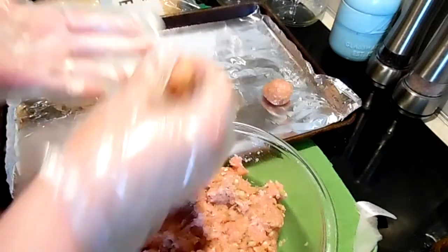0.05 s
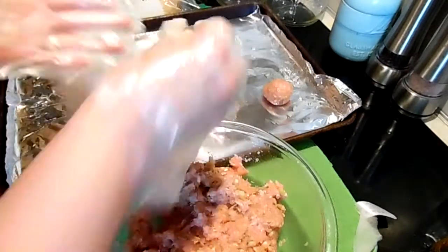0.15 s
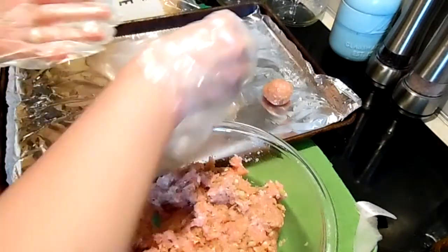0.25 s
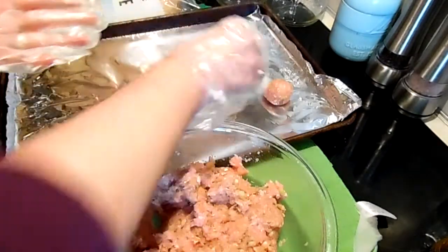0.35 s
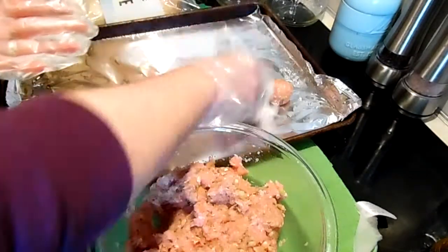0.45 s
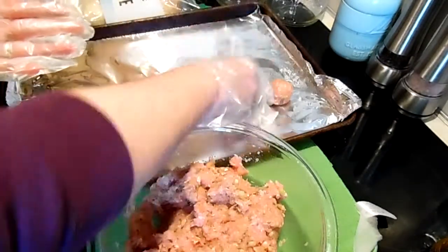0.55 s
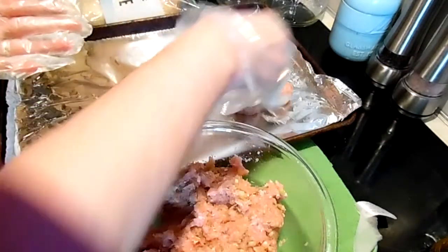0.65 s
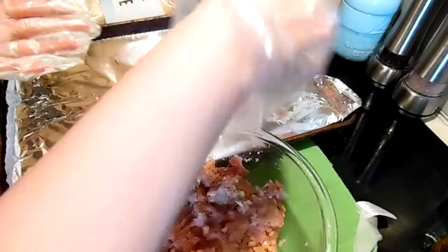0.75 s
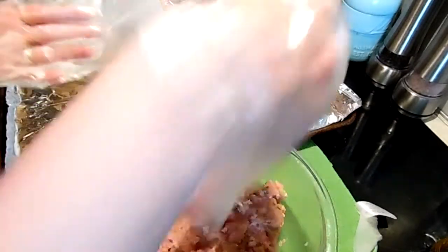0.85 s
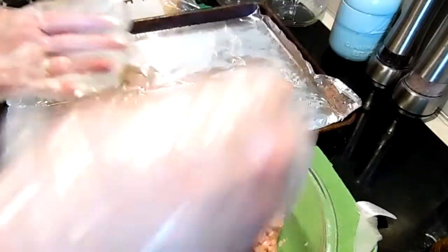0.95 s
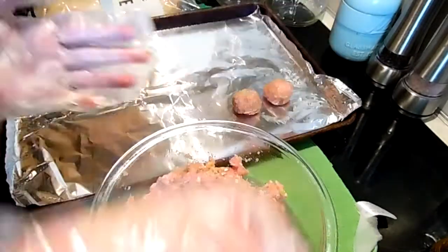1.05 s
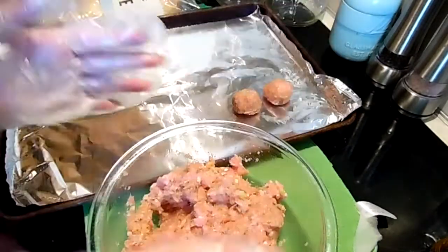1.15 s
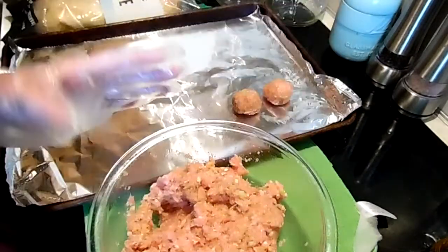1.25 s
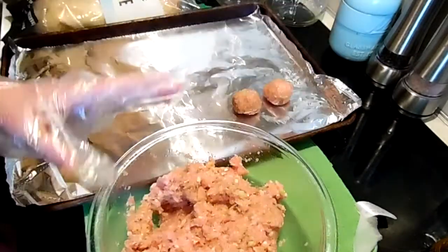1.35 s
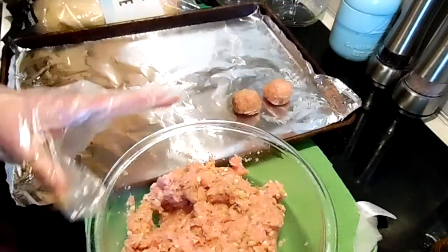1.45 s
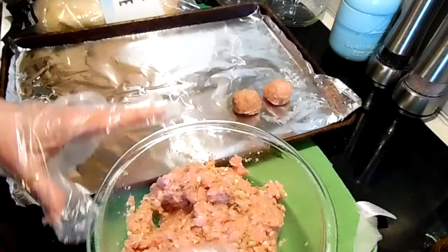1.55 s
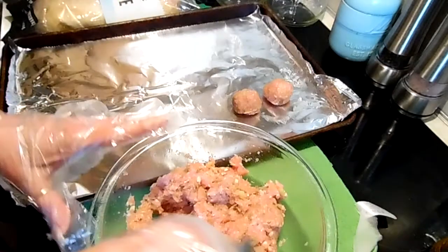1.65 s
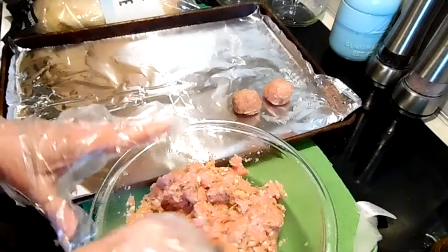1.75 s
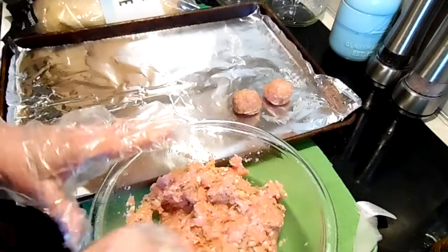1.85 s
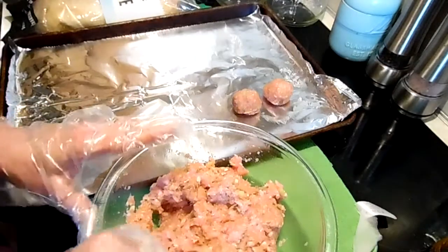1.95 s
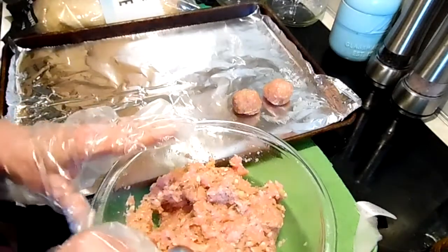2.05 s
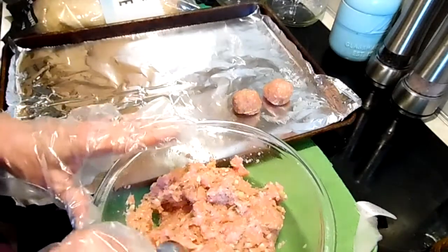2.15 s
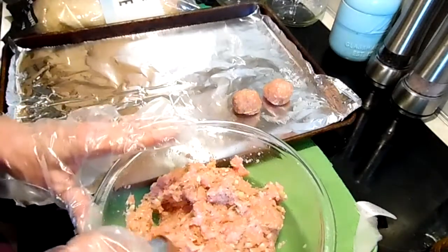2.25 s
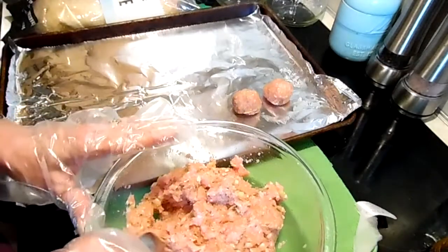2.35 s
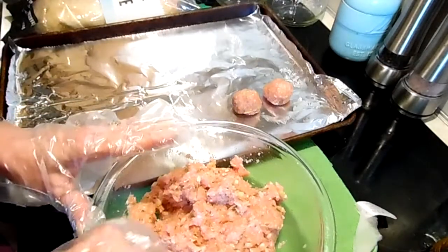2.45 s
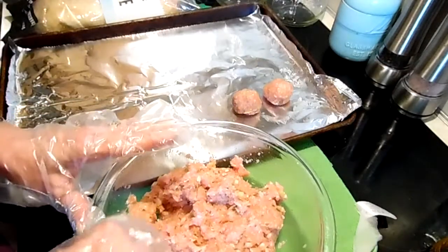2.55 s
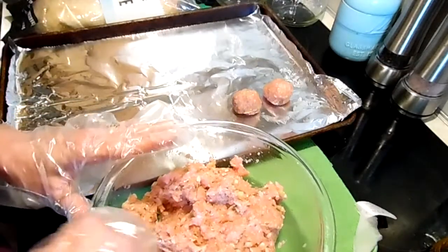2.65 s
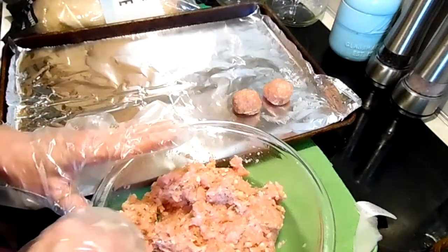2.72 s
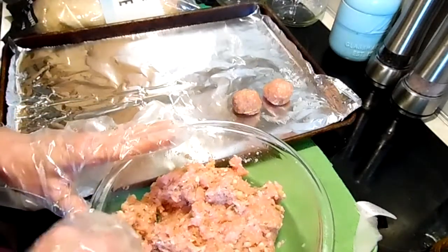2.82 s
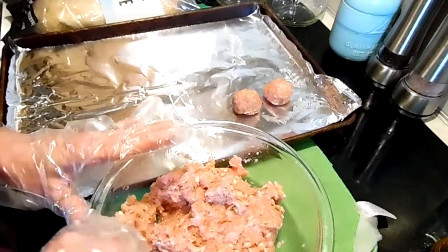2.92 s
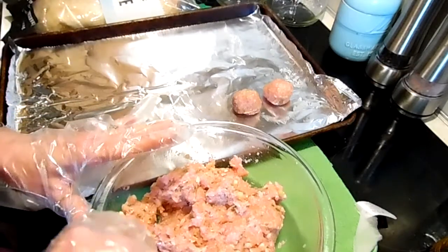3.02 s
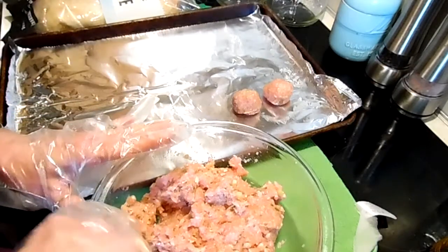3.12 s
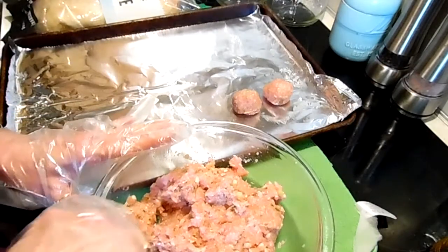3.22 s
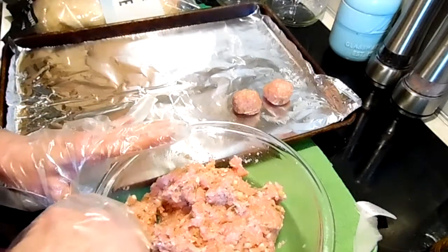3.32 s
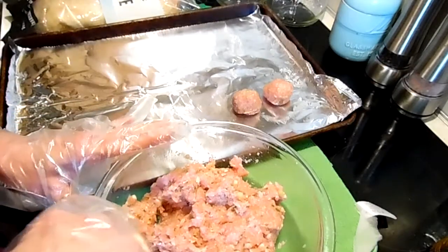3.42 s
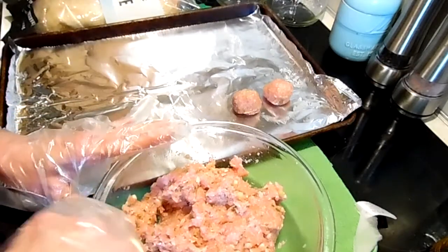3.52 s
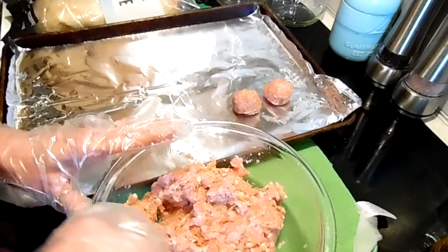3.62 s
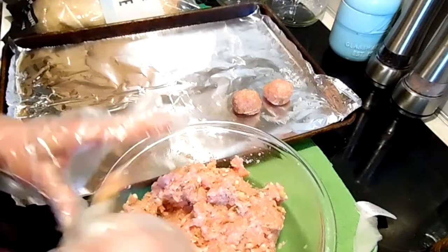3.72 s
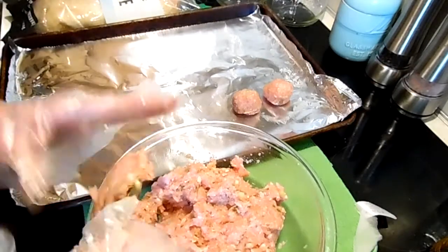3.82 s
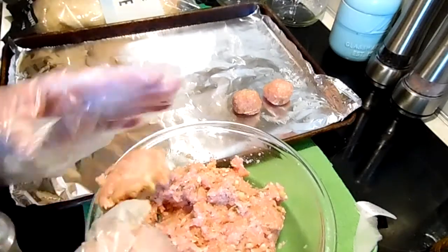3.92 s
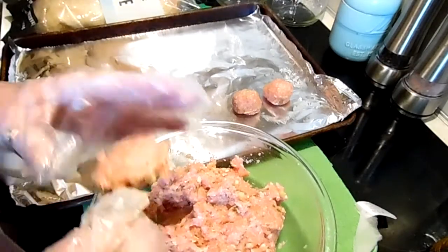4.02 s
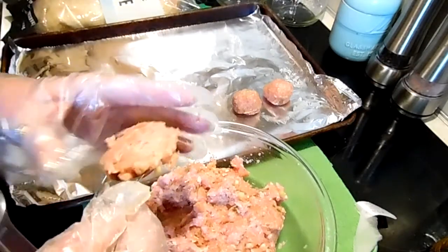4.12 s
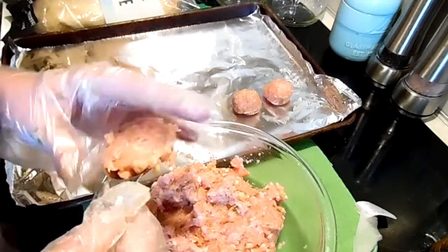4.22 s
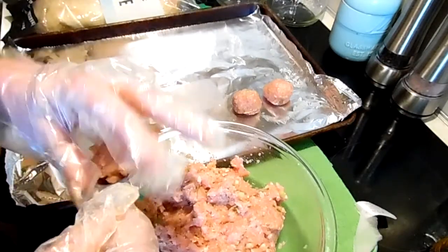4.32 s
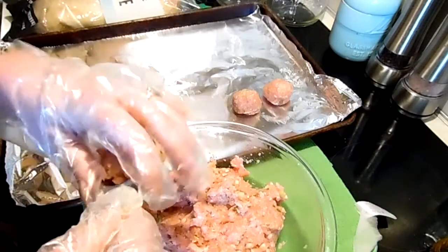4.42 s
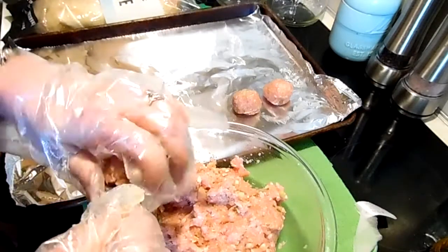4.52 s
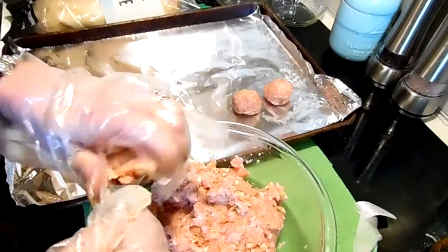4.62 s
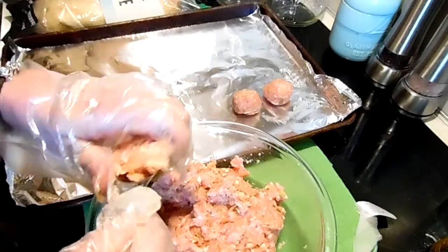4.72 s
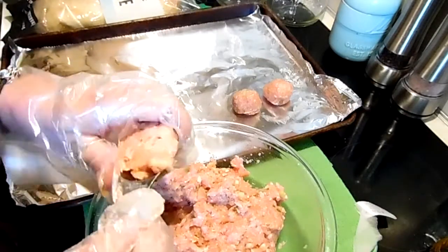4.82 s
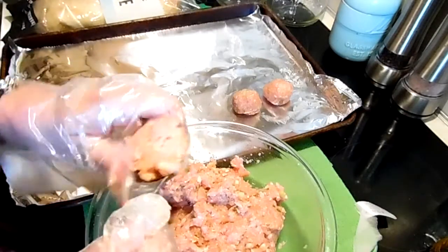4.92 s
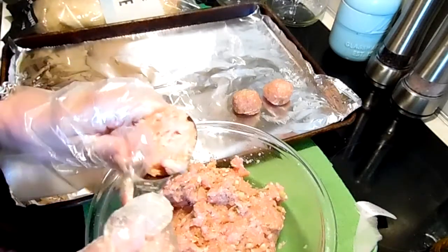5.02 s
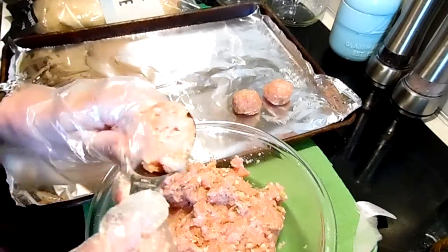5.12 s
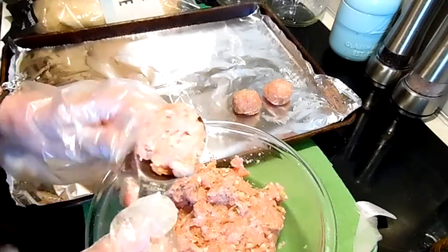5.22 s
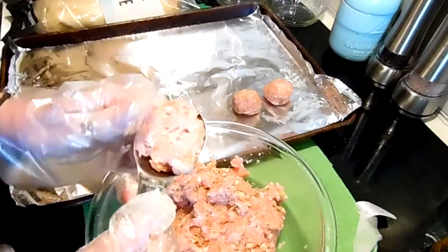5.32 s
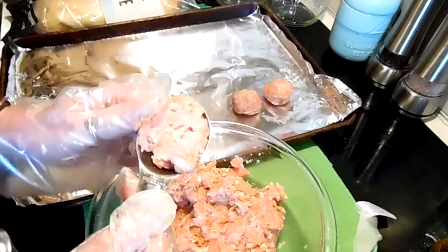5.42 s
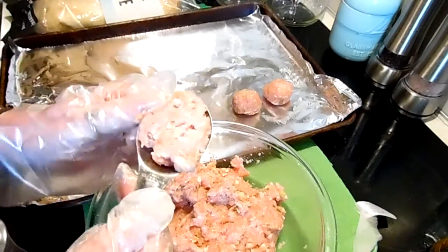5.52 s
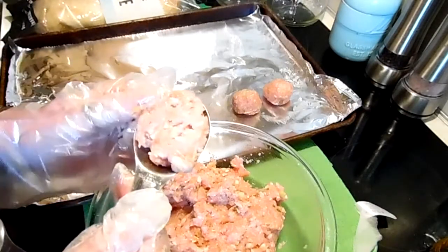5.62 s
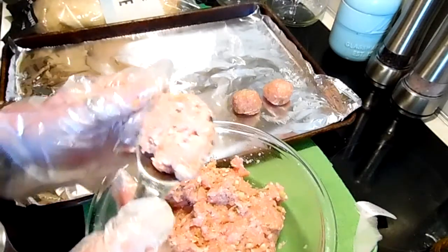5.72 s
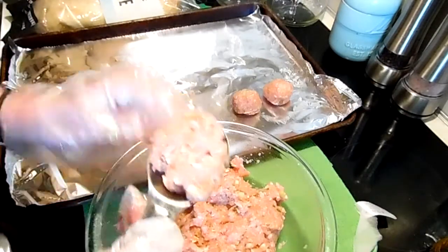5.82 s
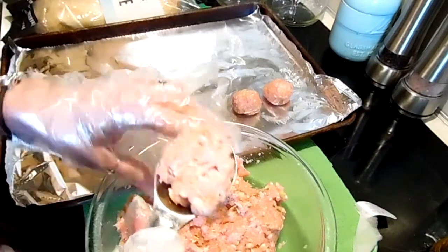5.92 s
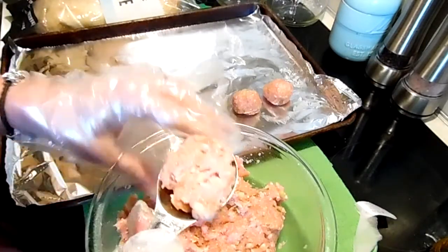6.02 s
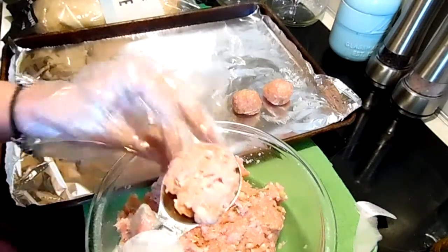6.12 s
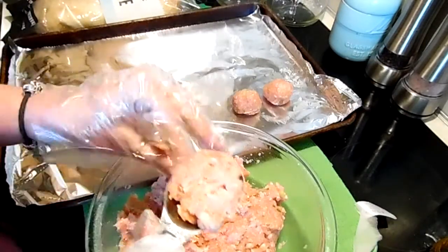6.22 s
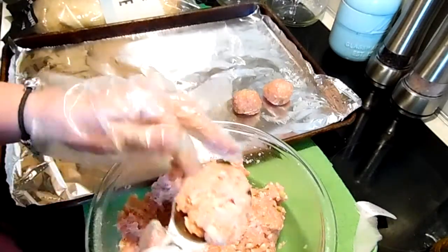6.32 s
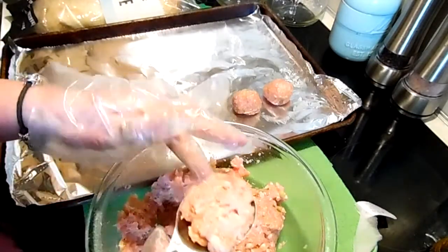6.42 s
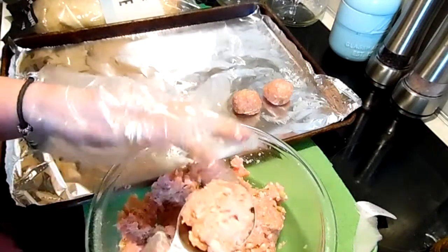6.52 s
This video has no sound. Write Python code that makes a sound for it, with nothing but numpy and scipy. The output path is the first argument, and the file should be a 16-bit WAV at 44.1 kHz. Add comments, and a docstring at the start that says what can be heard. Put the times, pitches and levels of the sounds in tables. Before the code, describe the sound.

Thin plastic gloves crinkle close by in uneven bursts, and a metal spoon briefly clinks on a glass bowl over a low appliance hum.

```python
"""In a kitchen, thin plastic gloves crinkle close to one microphone as minced food is scooped and rolled.
The film buckles facet by facet, each facet radiating a click; a sudden pull, or a ball of food landing
on a foil tray, releases a burst of them. A metal spoon clinks and chatters on a glass bowl, exciting
its normal modes, and hands, food and utensils knock dully. Appliances hum over the air of the room."""
import sys
import numpy as np
from scipy import signal
from scipy.fft import rfft, irfft
from scipy.io import wavfile
from scipy.ndimage import uniform_filter1d

SR = 44100
rng = np.random.default_rng(int(sys.argv[2]) if len(sys.argv) > 2 else 0)


def to_wav(s):
    """Save 16-bit WAV."""
    ch = np.atleast_2d(s).T  # columns
    pcm = np.round(np.clip(ch, -1, 1) * 32767)  # PCM
    wavfile.write(sys.argv[1], SR, pcm.astype(np.int16))


N = 289104

# The swell of the whole background. Each row: time in seconds, level of the room air in dB.
BACKGROUND = [(0, -44), (.2, -41.5), (.56, -44.5), (.71, -50.5), (.82, -48.5), (1.31, -51), (1.92, -54.5),
              (2.55, -54.5), (2.94, -52.5), (3.45, -51.5), (4.38, -49), (5.11, -49), (5.82, -47.5),
              (5.97, -46), (6.56, -48)]


def gloves():
    """Incoherent sources add in power: fidgeting and squeezes sum to set the level of the crackle."""
    # Steady fidgeting. Each row: time in seconds, level in dB.
    fidgeting = [(0.0, -40), (0.05, -44.5), (0.45, -47.5), (0.6, -43), (0.705, -37.5), (0.727, -45.5),
                 (1.0, -50), (1.055, -45), (1.18, -43), (1.385, -31.5), (1.5, -41), (1.75, -42),
                 (2.08, -47), (2.19, -53), (2.7, -52.5), (3.0, -51.5), (3.54, -57.5), (3.58, -48),
                 (3.63, -54), (3.68, -40), (3.85, -39.5), (4.24, -40.5), (4.4, -37), (4.8, -39),
                 (4.86, -43.5), (5.22, -40), (5.5, -39), (5.66, -46), (5.77, -48), (5.83, -37),
                 (6.23, -37.5), (6.37, -42.5), (6.56, -32.5)]
    # Squeezes and rubs. Each row: time of the top in seconds, level in dB, rise and fall in seconds.
    squeezes = [(0.014, -28.5, 0.07, 0.017), (.11, -42.5, 0.071, 0.038), (.27, -41, 0.054, 0.12),
                (.39, -37.5, 0.067, 0.023), (.53, -26, 0.07, 0.064), (0.641, -25, 0.03, 0.028),
                (.86, -50, .1, .04), (.94, -48, .02, .05), (1.025, -36, 0.028, 0.027),
                (1.09, -41, .03, 0.07), (1.334, -30, 0.053, 0.081), (1.47, -35, 0.075, 0.032),
                (1.54, -36, 0.024, 0.021), (1.575, -32.5, 0.027, 0.051), (1.92, -45, 0.11, 0.043),
                (2.08, -45, .07, 0.091), (2.32, -58, .08, .03), (2.4, -48.5, 0.055, 0.2),
                (2.712, -49.5, 0.0072, 0.2), (2.9, -48.5, 0.012, .12), (3.12, -50, 0.095, 0.026),
                (3.24, -50.5, .03, .05), (3.59, -43, 0.028, 0.036), (3.74, -33.5, 0.1, 0.012),
                (3.79, -35.5, .03, 0.044), (4.03, -39.5, 0.24, 0.091), (4.35, -34, 0.06, .05),
                (4.46, -37, .06, 0.36), (4.79, -36.5, 0.14, 0.025), (4.99, -33, 0.24, 0.091),
                (5.14, -39.5, 0.072, 0.13), (5.28, -38.5, 0.052, 0.088), (5.375, -38, .03, 0.038),
                (5.93, -26.5, 0.097, 0.054), (6.14, -31, 0.19, 0.13), (6.33, -26, 0.097, 0.037),
                (6.44, -31, 0.1, 0.055)]
    # Duller creases under a crinkle of -40 dB. Each row: time in seconds, relative level in dB.
    crease_levels = [(0, -11.5), (.3, -15), (.48, -8.5), (.59, -9.5), (.65, -21), (.9, -15), (1.2, -16.5),
                     (1.38, -9), (1.5, -15.5), (2.2, -15), (3.5, -12.5), (3.85, -16.5), (4.4, -12),
                     (5.3, -15.5), (5.9, -12.5), (6.56, -14)]
    # Their spectrum. Each row: frequency in Hz, relative spectral density in dB.
    crease_spectrum = [(350, -40), (600, -3), (1000, -4), (2000, -1), (3500, -0.5), (5000, -2.5),
                       (8000, -26.5)]
    t = np.arange(N) / SR
    power = amp(curve(fidgeting, t)) ** 2
    for top, db, rise, fall in squeezes:
        power += amp(db - 15 * np.maximum((top - t) / rise, (t - top) / fall)) ** 2  # ends 15 dB down
    level_db = 10 * np.log10(power)
    lively_db = level_db + 40
    centre_hz = 8600 * (1 + 0.002 * lively_db + 0.015 * wander(12))  # lively hands pull the film tighter
    crease_db = curve(crease_levels, t) - 0.24 * lively_db + 2.1 * wander(8)  # creases grow more slowly
    clumps_db = 0.54 * wander(60) + 1.03 * wander(200)
    clicks = crackle(N, per_s=4000, spread_db=2, tail_db=4, tail_t60=0.075)
    film = film_colour(clicks, lambda s: np.interp(s, t, centre_hz), patchy_db=1.5)
    creases = unit_rms(shaped(clicks, lambda hz, s: spectrum_db(crease_spectrum, hz)))
    return amp(level_db + clumps_db) * (film + amp(crease_db) * creases)


def snaps():
    """A sudden load on film or foil sets off an avalanche of buckling that decays exponentially."""
    # Pulls of the film and touches on the tray. Each row: start in seconds, level in dB, centre in Hz.
    pulls = [(.0877, -42, 9170), (.2097, -34, 9420), (.473, -40, 7620), (.5373, -5.5, 9700),
             (.5474, -29, 11000), (.5594, -26, 6500), (.636, -17.5, 10400), (.665, -27.5, 6660),
             (.693, -26, 9300), (.9702, -38.5, 8270), (1.009, -38, 9690), (1.0216, -40, 10400),
             (1.0603, -34, 7200), (1.3905, -12.5, 5400), (1.3974, -17, 7310), (1.42, -15.5, 7500),
             (1.5273, -32, 11200), (1.5643, -32, 7320), (1.5876, -26, 6340), (2.0594, -37, 8650),
             (2.3015, -44, 7780), (2.397, -40, 7810), (2.4838, -48, 8080), (2.5244, -43, 7830),
             (2.7102, -45, 8510), (2.7701, -41, 8070), (2.8923, -36, 9390), (2.9327, -36.5, 7170),
             (2.9505, -39, 10400), (3.1163, -45, 8900), (3.235, -45, 6070), (3.476, -46, 8600),
             (3.5513, -43, 7840), (3.64, -42, 10400), (3.665, -33, 6550), (3.705, -36, 11300),
             (3.7883, -32, 6620), (4.2976, -34, 9490), (4.7202, -30, 8400), (4.8663, -35, 10100),
             (4.9177, -33.5, 8600), (5.357, -36, 8250), (5.7106, -36, 10700), (5.8172, -40, 8920),
             (6.0294, -30.5, 8530), (6.075, -28, 7660), (6.1407, -27.5, 6770), (6.3779, -32, 11500)]
    attack_s, t60 = 0.002, 0.081
    out, t = np.zeros(N), np.arange(6000) / SR
    for start, db, hz in pulls:
        clicks = crackle(len(t), per_s=8300, spread_db=-6, tail_db=-2.5, tail_t60=0.0061)
        burst = film_colour(clicks, lambda s: hz, patchy_db=3)
        envelope = amp(db - 60 * t / t60) * np.minimum(t / attack_s, 1)
        add(out, start - 0.001, envelope * burst)
    return out


def crackle(length, per_s, spread_db, tail_db, tail_t60):
    """Buckling as a Poisson process: facets of unequal size each shiver and leave a diffuse tail."""
    sizes = amp(spread_db * np.minimum(rng.exponential(1, length), 3.2))
    clicks = sizes * (rng.random(length) < per_s / SR)
    facet = rng.integers(0, 16, length)
    spectra = rfft(rng.standard_normal((16, 64)) * amp(-60 * np.arange(64) / SR / 0.0013))
    shivers = irfft(spectra / np.sqrt(np.mean(abs(spectra) ** 2, 0)))  # together they favour no pitch
    grains = sum(np.convolve(clicks * (facet == k), shiver)[:length] for k, shiver in enumerate(shivers))
    fade = amp(-60 * np.arange(4096) / SR / tail_t60) ** 2
    tail_power = abs(signal.oaconvolve(clicks ** 2, fade / fade.sum())[:length])
    tail = np.sqrt(tail_power) * rng.standard_normal(length)
    return unit_rms(grains + amp(tail_db) * tail)


def film_colour(x, centre_hz, patchy_db):
    """Tension raises a membrane's resonances: the spectrum slides, and patches ring more for a moment."""
    # The film centred on 9000 Hz. Each row: frequency in Hz, relative spectral density in dB.
    film_spectrum = [(1470, -24.5), (2500, -18), (4580, -9), (6500, -0.5), (10400, 1.5), (14100, -4),
                     (15200, -9), (16000, -10)]

    def gain_db(hz, t):
        noise = rng.standard_normal((len(hz), len(t)))
        patches = uniform_filter1d(uniform_filter1d(noise, 5, axis=0), 12, axis=1)
        slide = (9000 / centre_hz(t)) ** 0.79
        return spectrum_db(film_spectrum, hz * slide) + patchy_db * unit_rms(patches)
    return unit_rms(shaped(x, gain_db))


def spoon():
    """Modal superposition: each contact drives the same modes of the bowl, weighted by where it lands."""
    # The natural frequencies of the glass bowl in Hz.
    mode_hz = [690, 1822, 3428, 3500, 5329, 6400, 6653, 7306, 8199, 8480, 9275, 9964, 10600, 10882, 11240,
               12470, 13910, 4120, 4650, 10391]
    # The same modes. Each row: relative level in dB, time to decay by 60 dB in seconds.
    modes = [(-20.5, 0.24), (-11.5, 0.17), (1.5, 0.18), (-6.5, 0.1), (-7.5, 0.18), (-29, 0.092), (-8, 0.13),
             (1.5, 0.065), (-18, 0.059), (-12, .1), (-8, 0.11), (-17, .2), (-8, .1), (-6, .14), (-13, 0.32),
             (-9, 0.09), (-17, .08), (-19, 0.056), (-15, 0.066), (-10, .08)]
    # Spoon on glass. Each row: start in seconds, level in dB, extra dB for the modes below 3 kHz,
    # for those from 4 to 6 kHz and for those above 6 kHz, free ringing before damping in seconds.
    clinks = [(1.336, -44, 17, 19.5, 12, 0.022), (1.361, -49, 16, -3, -5, 0.018),
              (1.394, -22.5, -23, -4, 3, 0.0033), (1.398, -36, 12, 22, 15.5, 0.0077),
              (1.41, -27, 3.5, 3, 1, 0.013), (1.419, -22, -8, 0, 1, 0.014), (1.428, -53, -2, 11, 8, 0.015),
              (1.44, -43, 7, 10, -4, 0.02), (1.529, -52, -9, 15, 5, 0.026),
              (1.563, -24, -11, -5, -4, 0.034), (1.586, -50, -4, 3, 18, 0.0087),
              (1.612, -27, -7.5, -6, -20, 0.023), (1.656, -31, -9, -11, -12, 0.02),
              (1.708, -50, -10, -10, -10, 0.023)]
    out, t = np.zeros(N), np.arange(9000) / SR
    hz = np.array(mode_hz)[:, None]
    mode_db, t60 = np.transpose(modes)[:, :, None]
    phase = 2 * np.pi * rng.random(hz.shape)
    for start, db, low_db, upper_db, top_db, free_s in clinks:
        place_db = 3 * rng.standard_normal(hz.shape) * (hz > 6000)  # fine patterns vary most with place
        place_db += np.select([hz < 3000, hz > 6000, hz > 4000], [low_db, top_db, upper_db])
        swing = np.sin(2 * np.pi * hz * (t + round(start * SR) / SR) + phase)
        ring = (amp(db + mode_db + place_db - 60 * t / t60) * swing).sum(0)
        damped_db = np.maximum(-1100 * np.maximum(t - free_s, 0), -14)  # a little of the ring survives
        tick = amp(db - 18 - 60 * t / 0.0088) * np.diff(rng.standard_normal(len(t) + 1))
        add(out, start, ring * amp(damped_db) * np.minimum(t / 0.00053, 1) + tick)
    return out


def knocks():
    """A heavily damped impact gives a puff of noise in one broad resonance."""
    # Knocks of hands, food, spoon and bowl. Each row: start in seconds, level in dB, centre in Hz,
    # bandwidth of each of two filter passes in Hz, length in seconds.
    impacts = [(0.498, -40.5, 420, 400, .04), (0.535, -29, 500, 700, 0.016), (.536, -42, 3050, 4000, 0.01),
               (.555, -37.5, 1110, 915, 0.018), (1.336, -42.5, 550, 200, 0.088),
               (2.385, -47.5, 3340, 900, 0.036), (3.08, -43, 3550, 699, 0.011),
               (3.395, -52, 3540, 200, 0.018), (3.993, -47.5, 2010, 250, .015),
               (4.983, -43, 2100, 500, .012), (5.043, -52, 2100, 600, .01), (5.231, -49, 1950, 300, 0.015),
               (5.911, -43, 446, 400, 0.016), (5.935, -35.5, 416, 450, 0.016),
               (1.394, -44, 1480, 120, 0.044)]
    out, t = np.zeros(N), np.arange(4000) / SR
    for start, db, hz, width, length in impacts:
        b, a = signal.iirpeak(hz, hz / width, SR)
        noise = rng.standard_normal(len(t))
        puff = unit_rms(signal.lfilter(b, a, signal.lfilter(b, a, noise)))
        age = 4 * t / length  # loudest a quarter of the way through
        add(out, start, amp(db) * puff * age * np.exp(1 - age))
    return out


def appliances():
    """Harmonics of a motor shaft and mains hum, with tones at their sum frequencies and fainter ones."""
    # Shaft orders 1 to 3. Each row: level in dB, share of the background's swell, waver in dB,
    # waverings per second.
    orders = [(-51.5, 0.075, 1, 2.05), (-50, 0.76, 1, 6.6), (-46, .7, 1.27, 5)]
    # The whine stands out. Each row: middle in seconds, boost in dB, half length in seconds.
    whine_spells = [(.175, 12.5, 0.033), (0.963, 8, 0.24), (5.45, 5.5, 0.53)]
    shaft_hz, mains_hz, purr_hz, whine_hz, faint_hz, drone_hz = 50.03, 119.95, 520, 1101, 392, 32
    t = np.arange(N) / SR
    shaft = wavering_phase(shaft_hz, drift_hz=0.15, per_s=4.07)
    mains = 2 * np.pi * mains_hz * t
    motor = sum(tone_gain(*row) * np.sin(order * shaft + 2 * np.pi * rng.random())
                for order, row in enumerate(orders, 1))
    hum = tone_gain(-46.5, 0.7, 1, 6) * (np.sin(mains) + amp(-16) * np.sin(mains + shaft))
    slow_swell = amp(5 * np.cos(2 * np.pi * (t - 1.29) / 2.14))
    sum_tone = tone_gain(-65, 0.8, 1, 3.5) * slow_swell * np.sin(mains + 2 * shaft)
    purr = amp(-66.5 + 2.2 * wander(8.7)) * np.sin(wavering_phase(purr_hz, drift_hz=7, per_s=30))
    spells_db = sum(db * np.exp(-((t - middle) / half) ** 4) for middle, db, half in whine_spells)
    whine_gain = tone_gain(-70.5, 0.5, 0.5, 5) * amp(spells_db)
    whine = whine_gain * np.sin(wavering_phase(whine_hz, drift_hz=3.41, per_s=6))
    faint = tone_gain(-70.5, 1, 3, 4.5) * np.sin(2 * np.pi * faint_hz * t)
    drone = amp(-55.5) * np.sin(2 * np.pi * drone_hz * t) * np.clip((3.3 - t) / 0.15, 0, 1)  # ends at 3.3 s
    return np.sqrt(2) * (motor + hum + sum_tone + purr + whine + faint + drone)


def tone_gain(db, share, waver_db, per_s):
    """Amplitude modulation: a tone follows a share of the background's swell and wavers on its own."""
    swell_db = curve(BACKGROUND, np.arange(N) / SR) + 50
    return amp(db + share * swell_db + waver_db * wander(per_s))


def wavering_phase(hz, drift_hz, per_s):
    """Frequency modulation: phase is the integral of a randomly drifting frequency."""
    return 2 * np.pi * np.cumsum(hz + drift_hz * wander(per_s)) / SR


def room_air():
    """Ambient noise has a continuous spectrum, here strongest in the bass and slightly uneven in level."""
    # The air of the room. Each row: frequency in Hz, relative spectral density in dB.
    air_spectrum = [(15, -39), (40, -1.5), (63, -8), (78, -5.5), (175, -8), (260, -18), (470, -15.5),
                    (522, -10), (600, -22), (1100, -22.5), (2200, -31), (8800, -56), (16000, -45)]
    colour = amp(spectrum_db(air_spectrum, np.fft.rfftfreq(N, 1 / SR)))
    air = irfft(rfft(rng.standard_normal(N)) * colour, N)
    return amp(curve(BACKGROUND, np.arange(N) / SR) + 2 * wander(30)) * unit_rms(air)


def amp(db):
    """Amplitude grows tenfold every 20 dB."""
    return 10 ** (np.asarray(db) / 20)


def unit_rms(x):
    """Normalisation to a mean power of 1."""
    return x / np.sqrt(np.mean(x ** 2) + 1e-20)


def spectrum_db(points, hz):
    """Interpolation of levels on a logarithmic frequency axis."""
    point_hz, db = np.transpose(points)
    return np.interp(np.log(hz + 1), np.log(point_hz + 1), db)


def curve(points, t):
    """Linear interpolation of levels in time."""
    return np.interp(t, *np.transpose(points))


def add(mix, start, sound):
    """Superposition of a sound on the mix from a start in seconds."""
    part = mix[round(start * SR):][:len(sound)]
    part += sound[:len(part)]


def wander(per_s):
    """A random drift of rms 1 that turns per_s times a second."""
    return unit_rms(np.interp(np.arange(N) / SR * per_s, np.arange(2000), rng.standard_normal(2000)))


def shaped(x, gain_db):
    """Time-varying filtering: short frames are weighted by gain_db(Hz, seconds)."""
    hz, t, frames = signal.stft(x, SR, nperseg=256, noverlap=192)
    return signal.istft(frames * amp(gain_db(hz[:, None], t)), SR, nperseg=256, noverlap=192)[1][:len(x)]


def scene():
    """Sound pressures add at one microphone, which feeds both channels."""
    mono = gloves() + snaps() + spoon() + knocks() + appliances() + room_air()
    return np.array([mono, mono])


def record(dry):
    """Soft saturation rounds the loudest peak; a low-pass filter then limits the band."""
    ceiling, edge_hz = 0.78, 15850
    saturated = dry / (1 + abs(dry / ceiling) ** 6) ** (1 / 6)
    low_pass = signal.firwin(511, edge_hz, window=("kaiser", 9), fs=SR)
    return signal.oaconvolve(saturated, low_pass[None], "same")


dry = scene()
out = record(dry)
to_wav(out)
```